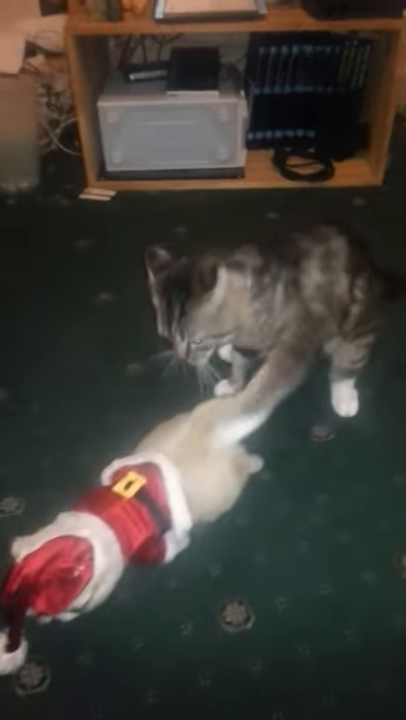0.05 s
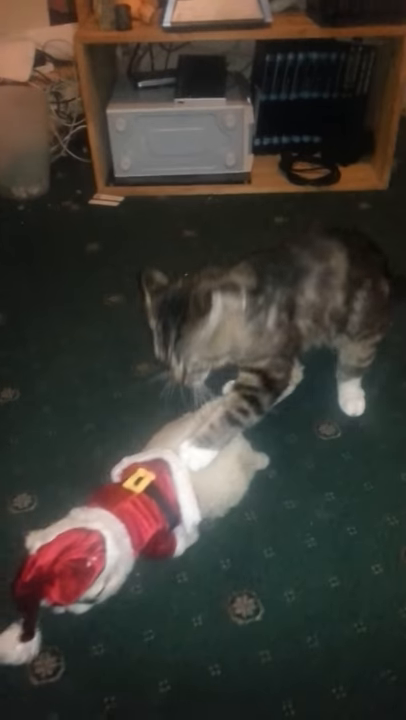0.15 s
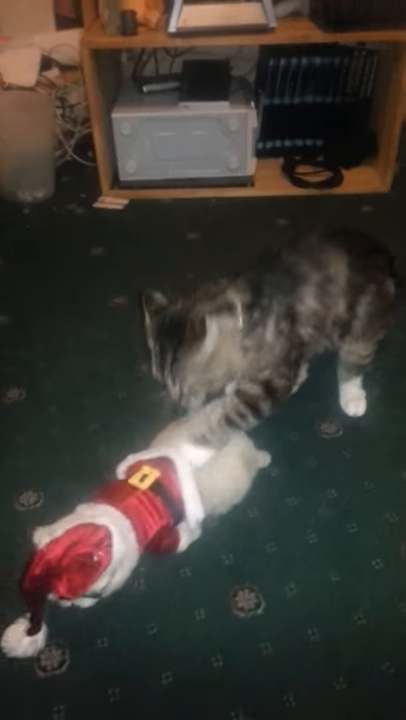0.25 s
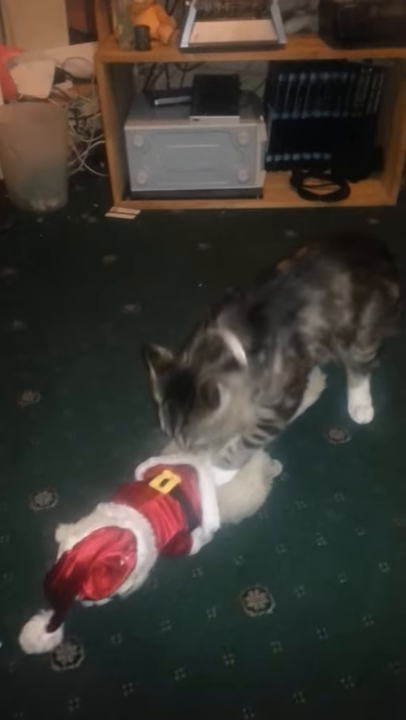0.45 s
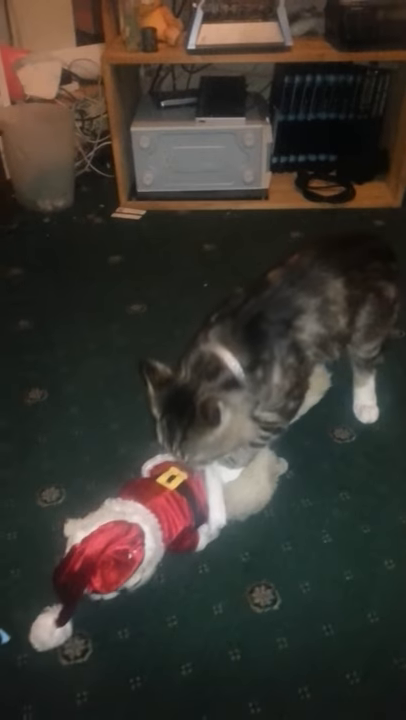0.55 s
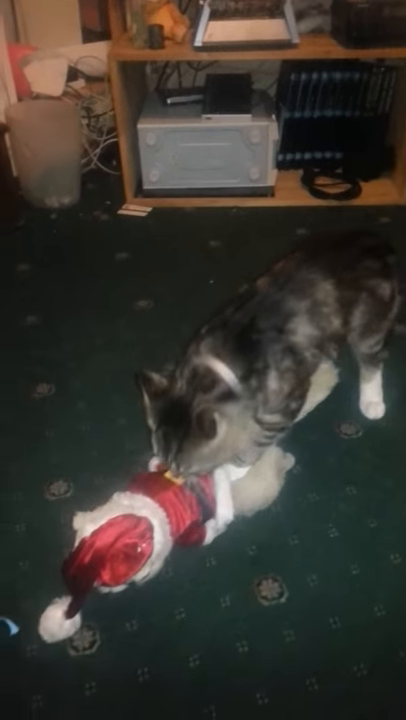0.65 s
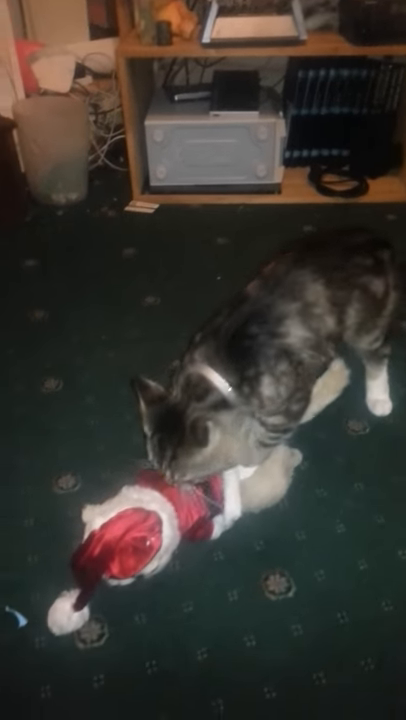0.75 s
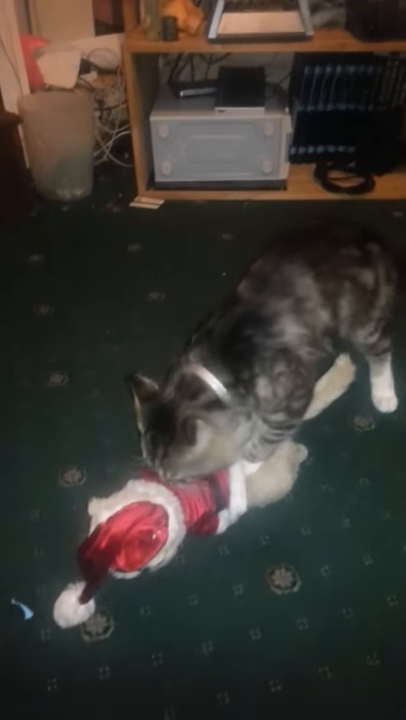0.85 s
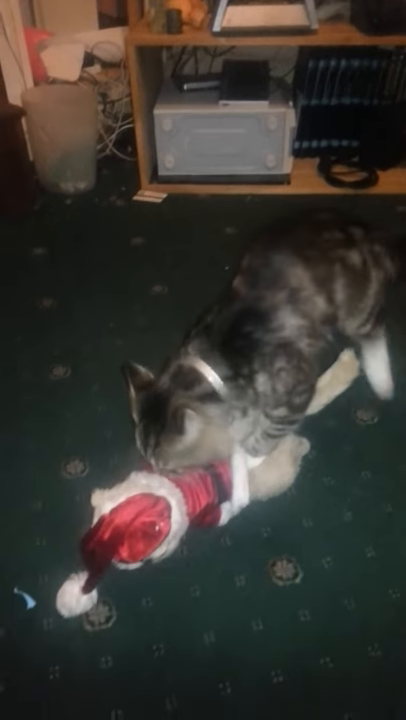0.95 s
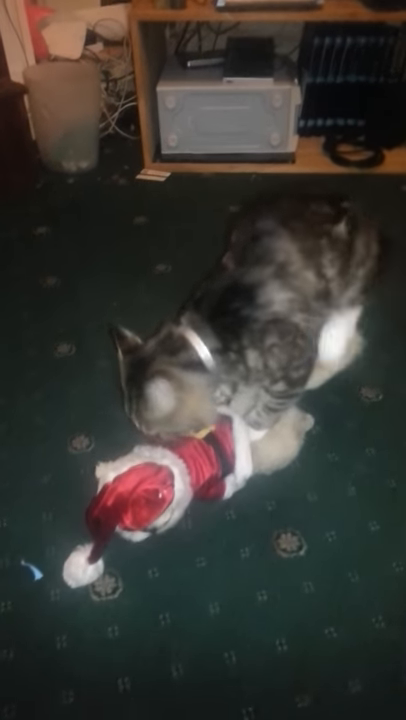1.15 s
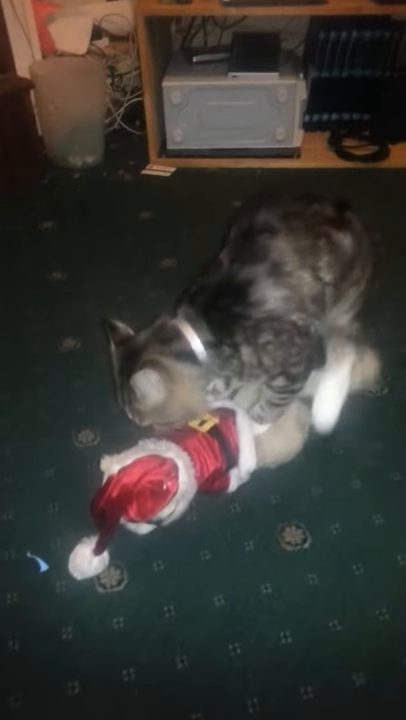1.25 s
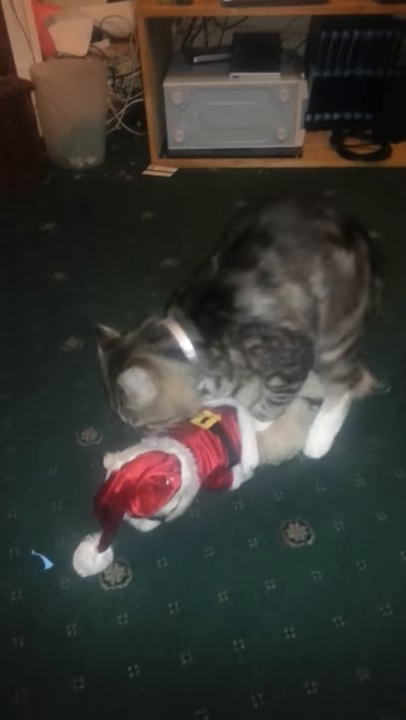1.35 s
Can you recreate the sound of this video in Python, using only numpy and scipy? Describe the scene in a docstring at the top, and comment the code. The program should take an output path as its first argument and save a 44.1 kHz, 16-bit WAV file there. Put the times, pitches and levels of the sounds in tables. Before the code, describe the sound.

A cat growls once, close on the right in a carpeted room. A claw softly taps a plush toy at 0.1 seconds. The growl begins at 0.2, low and fluttering, then rises from 0.6 into a louder, brighter whine that turns raspy and breaks around 0.9. It clears and sinks into a last flutter by 1.1, as a paw dully scuffs the carpet. Faint rumble, hum and hiss lie underneath.

```python
"""A carpeted room, with a low rumble, a deep hum, hiss and a faint fading tone. Close by on the right,
a claw catches a plush toy and a cat growls once over it. Its vocal folds flutter low behind a shut
mouth, then rise into a whine that brightens as the mouth opens. The voice turns raspy, breaks into
alternating long and short cycles, clears, and sinks into a last flutter as a paw scuffs the carpet."""
import sys
import numpy as np
from scipy import signal
from scipy.fft import rfft, irfft, next_fast_len
from scipy.io import wavfile

SR = 44100
rng = np.random.default_rng(int(sys.argv[2]) if len(sys.argv) > 2 else 0)


def dump(signal):
    """Clip the signal to [-1, 1] and save it as 16-bit WAV at the path in sys.argv[1]."""
    limited = np.clip(np.atleast_2d(signal).T, -1, 1)
    pcm = np.round(limited * 32767).astype(np.int16)
    wavfile.write(sys.argv[1], SR, pcm)


N = 61739
TIME = np.arange(N) / SR
FFT_SIZE = 2 * next_fast_len(N)
BIN_HZ = np.maximum(np.arange(FFT_SIZE // 2 + 1) * SR / FFT_SIZE, 1)


def from_db(db):
    """Decibels to gain."""
    return 10 ** (np.asarray(db) / 20)


def unit_rms(x):
    """Scale to unit rms."""
    return x / np.sqrt(np.mean(x ** 2) + 1e-20)


def automation(rows):
    """One lane per column after the time, in straight ramps between breakpoints."""
    times, *columns = np.transpose(rows)
    return [np.interp(TIME, times, column) for column in columns]


def fader(rows):
    """Gain over time from a level table."""
    return from_db(automation(rows)[0])


def eq_gain(curve):
    """Gain of an EQ curve at every frequency bin."""
    hz, db = np.transpose(curve)
    return from_db(np.interp(np.log(BIN_HZ), np.log(hz), db))


def equalise(x, curve):
    """Minimum-phase EQ: it rings only after the sound that excites it."""
    cepstrum = irfft(np.log(eq_gain(curve)))
    cepstrum[1:FFT_SIZE // 2] *= 2
    cepstrum[FFT_SIZE // 2 + 1:] = 0
    return irfft(rfft(x, FFT_SIZE) * np.exp(rfft(cepstrum)))[..., :N]


def drift(rate_hz):
    """Smooth random modulation at unit rms."""
    lowpass = signal.butter(2, rate_hz, fs=SR, output="sos")
    return unit_rms(signal.sosfilt(lowpass, rng.standard_normal(2 * N))[N:])


# dark EQ of the room tone: (frequency [Hz], gain [dB])
RUMBLE_EQ = [(20, -21), (45, -18), (66, -9.5), (90, -7), (130, -3.5), (200, 0.5), (330, -3), (520, -10),
             (900, -24), (2000, -46.5)]
# its fader ride: (time [s], level [dB])
RUMBLE_LEVEL = [(0, -55.5), (.16, -57), (.22, -58.5), (.55, -62.5), (.8, -61.5), (1.05, -63), (1.16, -58),
                (1.4, -58.5)]
def room_rumble(shared_power=.3):
    """A bed of low noise, partly common to both sides."""
    centre = np.sqrt(shared_power) * rng.standard_normal(N)
    sides = np.sqrt(1 - shared_power) * rng.standard_normal((2, N))
    return unit_rms(equalise(centre + sides, RUMBLE_EQ)) * fader(RUMBLE_LEVEL)


# broad EQ of the hiss: (frequency [Hz], gain [dB])
HISS_EQ = [(100, -6), (600, 6.5), (1200, 2.5), (1750, 3), (2300, 0), (4000, -2.5), (6300, -7), (9000, -4.5),
           (14500, -4)]
# its gentle swell: (time [s], level [dB])
HISS_LEVEL = [(0, -54.5), (.2, -54.5), (.6, -53), (1.0, -52), (1.15, -55), (1.4, -56.5)]
def microphone_hiss(right_lead_db=2.5):
    """Wide, separate noise on each side, leaning right."""
    hiss = unit_rms(equalise(rng.standard_normal((2, N)), HISS_EQ))
    pan = from_db([[-right_lead_db / 2], [right_lead_db / 2]])
    return hiss * fader(HISS_LEVEL) * pan


# the hum comes and goes: (time [s], level [dB])
HUM_LEVEL = [(0, -70), (.16, -65), (.2, -100), (.55, -76), (.6, -71), (.84, -83), (1.4, -78)]
def hum(hz=64.8):
    """A deep, slightly unsteady sine."""
    return np.sqrt(2) * np.sin(2 * np.pi * hz * TIME + .5 * drift(8.7)) * fader(HUM_LEVEL)


def thin_tone(hz=1718, start_db=-67, fade_db_per_s=49):
    """A faint, wavering background sine that fades from the start."""
    fade = from_db(start_db - fade_db_per_s * TIME)
    return np.sqrt(2) * np.sin(2 * np.pi * hz * TIME + drift(40)) * fade


# two-peaked tick of claw on toy: (frequency [Hz], gain [dB])
CLAW_EQ = [(300, -8), (850, 9), (1900, -2), (3000, 9), (6000, -27)]
def claw(onset_s=.08, decay_s=.003, drive_db=-44):
    """A claw catches the toy: one soft tap of fast-decaying noise."""
    age = TIME - onset_s
    burst = (age >= 0) * np.exp(-np.abs(age) / decay_s) * rng.standard_normal(N)
    return equalise(from_db(drive_db) * burst, CLAW_EQ)


# sweep of the throat resonance: (time [s], centre [Hz], boost [dB])
THROAT_SWEEP = [(.2, 1000, 7.5), (.3, 1250, 6.5), (.56, 1370, 10), (.66, 1615, 14), (.71, 1590, 16.5),
                (.742, 1426, 29), (.759, 1480, 24), (.766, 1710, 10.5), (.778, 1620, 0), (.787, 1590, 6),
                (.808, 1510, 15), (.825, 1500, 4.5), (.87, 1593, 22), (.915, 1494, 10), (.95, 1682, 22),
                (1.0, 1760, 9.5), (1.07, 1696, 9.5)]
def overtone(order, phase, pitch_hz, throat_width_hz=135, waver_db=2.7, smear_rad=.55):
    """One wavering partial, boosted near the throat resonance and blurred by breath if high."""
    throat_hz, boost_db = automation(THROAT_SWEEP)
    hz = order * pitch_hz
    nearness = np.exp(-((hz - throat_hz) / throat_width_hz) ** 2)
    blur_rad = np.minimum((hz / 4400) ** 3, .8) * drift(120)
    gain = from_db(boost_db * nearness + waver_db * drift(13))
    lag_rad = smear_rad * order ** 2   # highs trail, so the pulses ring instead of snapping
    return gain * np.cos(order * phase - lag_rad + blur_rad)


def period_doubling(rasp, start_s=.815, end_s=.955, fade_s=.018):
    """How strongly the folds alternate long and short cycles: one full break, plus a little with rasp."""
    inside_s = np.minimum(TIME - start_s, end_s - TIME)
    voice_break = np.clip(.5 + inside_s / fade_s, 0, 1)
    return voice_break + .22 * rasp * (.34 + drift(33))


def breath(phase, pitch_hz, rasp, base_db=-29, rasp_db=-11.5):
    """Air puffs through the folds once a cycle, harder with rasp."""
    noise = rng.standard_normal(N) * np.sqrt(SR / 2 / pitch_hz)
    puffs = unit_rms(1 + np.cos(phase))
    return noise * puffs * (from_db(base_db) + from_db(rasp_db) * rasp)


# pitch line of the vocal folds: (time [s], pitch [Hz])
GROWL_PITCH = [(.16, 362), (.19, 349.4), (.24, 328.2), (.29, 318.5), (.45, 320.8), (.5, 309.8),
               (.55, 336.4), (.6, 359.4), (.67, 396.2), (.73, 409.5), (.8, 429.3), (.89, 421), (.96, 438.9),
               (1.0, 431.4), (1.07, 401.2), (1.1, 366.1)]
# grit in the voice, 0 is clean: (time [s], flutter [amount], rasp [amount])
GROWL_GRIT = [(.16, 0.56, 0.25), (.25, 1.07, 0.74), (.5, 1.32, 1), (.59, 0.24, 0.28), (.695, 0.12, 0.32),
              (.725, 0, 0.9), (.755, 0.08, 0.6), (.77, 0.03, 0.3), (.795, 0, 0.73), (.82, 0.17, 0.57),
              (.99, 0, 0.32), (1.07, 0.42, 0.31), (1.11, 1.66, 0.96)]
FLUTTER_HZ, FLUTTER_BEND, FLUTTER_DEPTH = 44.03, .0517, .2   # rate; pitch and level swing at flutter 1
RASP_HZ, JITTER_RAD, SHIMMER = 130, .135, .22   # rate; phase and level shake at rasp 1
def vocal_folds(undertone_db=-21, top_order=16):
    """The folds chop air into fluttering, rasping pulses; returns the fundamental and the overtones."""
    pitch_hz, = automation(GROWL_PITCH)
    flutter_amount, rasp = automation(GROWL_GRIT)
    flutter_hz = FLUTTER_HZ * (1 + .18 * drift(18.66))
    flutter = flutter_amount * np.sin(2 * np.pi * np.cumsum(flutter_hz) / SR)
    phase = 2 * np.pi * np.cumsum(pitch_hz * (1 + FLUTTER_BEND * flutter)) / SR
    doubling = period_doubling(rasp)
    sub_octave = from_db(undertone_db) * doubling * np.cos(phase / 2)
    fundamental = np.sqrt(2) * (np.cos(phase) + sub_octave)
    phase = phase + JITTER_RAD * rasp * drift(RASP_HZ)
    # pulses come early and late, strong and weak in turn, which feeds the half-order overtones
    swing_rad, accent = .18 * doubling, .4 * doubling
    pulses = np.zeros(N)
    for order in range(2, top_order + 1):
        half_order = order - .5
        pulses += np.cos(order * swing_rad) * overtone(order, phase, pitch_hz)
        pulses += (np.sin(half_order * swing_rad) + accent) * overtone(half_order, phase, pitch_hz)
    pulses *= np.sqrt(2) * (1 + SHIMMER * rasp * drift(RASP_HZ))
    tremolo = 1 + FLUTTER_DEPTH * flutter
    return fundamental * tremolo, (pulses + breath(phase, pitch_hz, rasp)) * tremolo


# low body of the growl: (time [s], level [dB])
FUNDAMENTAL_LEVEL = [(.15, -87), (.168, -53), (.26, -45.5), (.39, -46), (.52, -47), (.575, -49),
                     (.597, -39), (.665, -42), (.715, -38.5), (.772, -50.5), (.83, -41.5), (.89, -45.5),
                     (.985, -38.5), (1.055, -46), (1.08, -35), (1.098, -52.5), (1.135, -51), (1.16, -82)]
# overtones into the mouth: (time [s], drive [dB], opening [0 or less shut, 1 ajar, 2 or more wide])
MOUTH_MOVES = [(.15, -86, -2), (.18, -55.5, 0.26), (.26, -50, 0), (.42, -51, 0.47), (.525, -59.5, -0.13),
               (.56, -51.5, 0.1), (.64, -45, 0.74), (.66, -33.5, 1), (.7, -43.5, 1.52), (.74, -48.5, 2.5),
               (.795, -44, 2.5), (.85, -46.5, 1.71), (.91, -49, 2.5), (.965, -39, 1.35), (1.035, -50, 2.5),
               (1.075, -52.5, 2.5), (1.1, -53.5, 0.25), (1.15, -68, 1)]
# formants of the three mouth shapes: (frequency [Hz], gain [dB])
SHUT_EQ = [(200, -35.5), (420, -5), (640, -1), (740, -6), (900, 0.5), (1100, -11), (1320, -7.5), (1580, -3),
           (1800, -35), (2600, -30.5), (6000, -27)]
AJAR_EQ = [(200, -68), (450, 2), (640, -18), (800, -13.5), (1080, -5.5), (1230, -13.5), (1380, -15.5),
           (1600, -10.5), (1780, -11.5), (1980, -10), (2300, -19.5), (3200, -38.5), (5000, -53)]
WIDE_EQ = [(200, -15.5), (500, -13.5), (640, -4.5), (850, -3), (1050, -14), (1270, -0.5), (1370, -14.5),
           (1490, -2.5), (1740, -6.5), (1930, 1.5), (2120, -6.5), (2300, -18.5), (2550, -3.5),
           (2750, -15.5), (3000, -11), (3400, -22.5), (4200, -15), (5150, -18), (5900, -27.5), (9000, -32)]
def growl():
    """The opening mouth crossfades the overtones through three EQs; the fundamental bypasses them."""
    fundamental, overtones = vocal_folds()
    drive_db, opening = automation(MOUTH_MOVES)
    driven = overtones * from_db(drive_db)
    shut = equalise(driven * np.clip(1 - opening, 0, 1), SHUT_EQ)
    ajar = equalise(driven * np.maximum(1 - np.abs(opening - 1), 0), AJAR_EQ)
    wide = equalise(driven * np.maximum(opening - 1, 0), WIDE_EQ)
    return fundamental * fader(FUNDAMENTAL_LEVEL) + shut + ajar + wide


# a brief glint on top of the whine: (time [s], level [dB])
WHISTLE_LEVEL = [(.948, -70), (.968, -52), (1.008, -50.5), (1.065, -68)]
def whistle(order=10):
    """One high overtone sings out as the voice clears."""
    pitch_hz, = automation(GROWL_PITCH)
    phase = 2 * np.pi * np.cumsum(pitch_hz) / SR
    gate = (TIME > WHISTLE_LEVEL[0][0]) & (TIME < WHISTLE_LEVEL[-1][0])
    return np.sqrt(2) * np.cos(order * phase) * fader(WHISTLE_LEVEL) * gate


# swell of the scuff: (time [s], level [dB])
PAW_LEVEL = [(1.08, -79), (1.16, -58.5), (1.25, -60), (1.32, -71), (1.4, -61.5)]
# its muffled EQ: (frequency [Hz], gain [dB])
PAW_EQ = [(40, -44), (80, -7), (115, 0), (170, -7), (300, -37)]
def paw():
    """A paw shifts on the carpet: a dull scuff of low noise."""
    return unit_rms(equalise(rng.standard_normal(N), PAW_EQ)) * fader(PAW_LEVEL)


# shadow on the far, left side: (frequency [Hz], left minus right [dB])
LEFT_SHADOW = [(150, 0.5), (370, -4.5), (690, -8), (1300, -17), (1800, -15), (2600, -25), (4500, -14),
               (9000, -26)]
def place_in_room(x, left_lag_s=.00009, t60_s=.19, predelay_s=.003, reverb_db=-12):
    """Sound from the right reaches the left later and duller; the soft room adds a short tail."""
    shadow = eq_gain(LEFT_SHADOW)
    left = shadow * np.exp(-2j * np.pi * BIN_HZ * left_lag_s)
    direct = np.array([left, np.ones_like(shadow)]) * np.sqrt(2 / (1 + shadow ** 2))   # constant power
    tail = rng.standard_normal((2, N)) * 1000 ** (-TIME / t60_s) * (TIME > predelay_s)
    tail = unit_rms(tail) / np.sqrt(N) * from_db(reverb_db)
    reverb = rfft(tail, FFT_SIZE) * np.abs(direct) ** .1   # the tail is barely shadowed
    return irfft(rfft(x, FFT_SIZE) * (direct + reverb))[:, :N]


def scene():
    """The cat up front on the right, over a quiet bed of room tone."""
    cat = place_in_room(growl() + whistle() + claw() + paw())
    return cat + hum() + thin_tone() + room_rumble() + microphone_hiss()


CUTOFF_HZ = 14550
def record(dry):
    """A steep high cut on the whole mix."""
    taps = signal.firwin(501, CUTOFF_HZ, fs=SR)
    return signal.fftconvolve(dry, taps[None], mode="same", axes=1)


dry = scene()
out = record(dry)
dump(out)
```